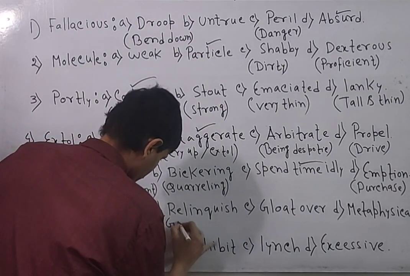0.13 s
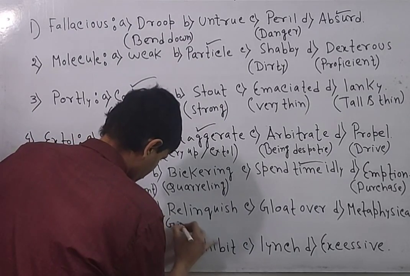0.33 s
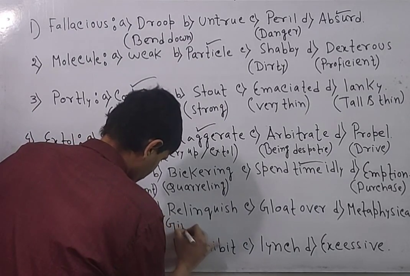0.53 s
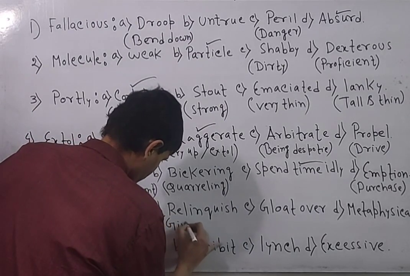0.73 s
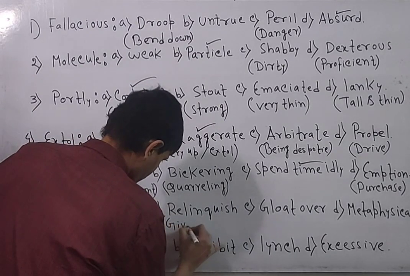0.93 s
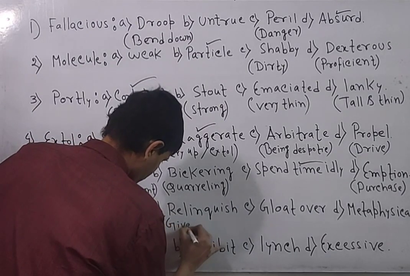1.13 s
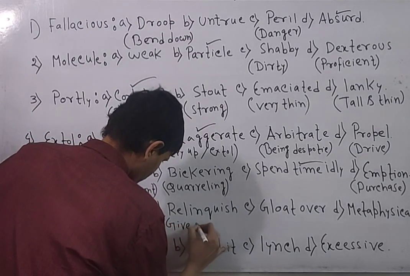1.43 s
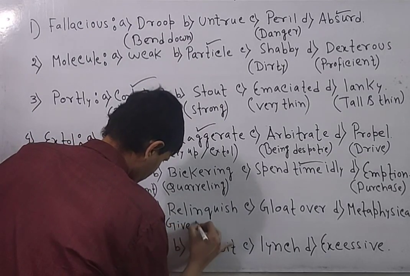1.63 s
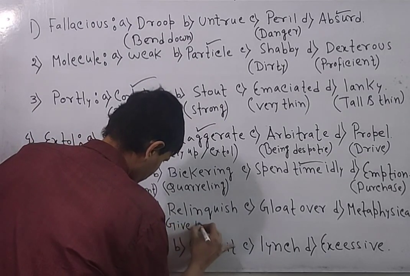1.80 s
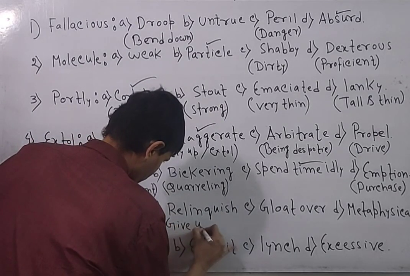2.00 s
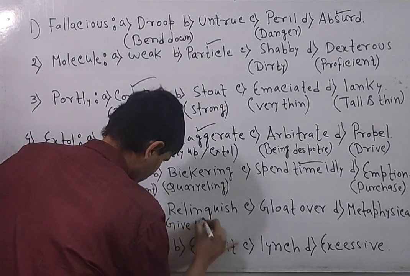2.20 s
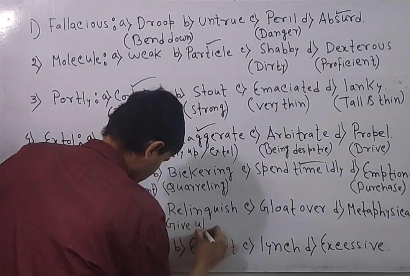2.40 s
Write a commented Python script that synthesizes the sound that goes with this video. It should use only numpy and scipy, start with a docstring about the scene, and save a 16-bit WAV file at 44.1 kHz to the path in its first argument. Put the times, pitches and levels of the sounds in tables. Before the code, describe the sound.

A felt marker taps and rubs on a wall-hung whiteboard in a small, boomy room

```python
"""Over faint room noise a knock booms away; a marker is writing letters on a wall-hung whiteboard.
Each touch-down in the small, bare classroom is made of short swelling tones and a tick of noise.
Standing waves, a few wall reflections and a tail of scattered echoes let board and room boom on.
Between knocks the felt tip rubs in short, dry strokes: shaped noise that follows the pen's speed."""
import sys
import numpy as np
from scipy import signal
from scipy.fft import rfft, irfft, next_fast_len
from scipy.io import wavfile

SR = 44100
rng = np.random.default_rng(int(sys.argv[2]) if len(sys.argv) > 2 else 0)


def unload_audio(sound):
    """Save the sound as a 16-bit wav file, at the path given as the first command line argument."""
    columns = np.transpose(np.atleast_2d(sound))
    # keep every value between -1 and 1, then stretch to whole-number steps
    steps = np.round(np.clip(columns, -1, 1) * 32767)
    wavfile.write(sys.argv[1], SR, steps.astype(np.int16))


N = 112454
LEAD = SR // 4  # samples computed ahead of time zero, so that earlier sounds can ring into the scene

# Tone colour of felt rubbing on the board: (frequency [Hz], relative level [dB])
FELT_HISS = [(500, -1), (1200, -12), (1700, -3.5), (2250, -5.5), (3000, -14), (3750, -1), (4350, -6.5),
             (4900, -1.5), (5450, -0.5), (6400, -9.5), (8800, -8), (10400, -12), (11700, -5),
             (13100, -16.5), (14400, -5.5), (15500, -16.5)]


def amp(db):
    """Turns decibels into gain."""
    return 10 ** (np.asarray(db) / 20)


def unit(x):
    """Scales a sound to an rms (average strength) of 1."""
    return x / np.sqrt(np.mean(x ** 2) + 1e-20)


def read(points, hz):
    """Reads between the points of a table, along a logarithmic frequency axis."""
    f, value = np.transpose(points)
    return np.interp(np.log(hz + 1), np.log(f), value)


def colour(x, db_at):
    """Makes each frequency louder or softer; db_at gives the decibels for a frequency in Hz."""
    size = next_fast_len(len(x) + 2048)
    gain = amp(db_at(np.fft.rfftfreq(size, 1 / SR)))
    return irfft(rfft(x, size) * gain, size)[:len(x)]


def coloured_noise(size, points):
    """Random noise with the tone colour of a table, at rms 1."""
    return unit(colour(rng.standard_normal(size), lambda hz: read(points, hz)))


def add(track, s, sound):
    """Adds a sound, s seconds after time zero, to a track that starts LEAD samples earlier."""
    part = track[LEAD + round(s * SR):][:len(sound)]
    part += sound[:len(part)]  # changes the track itself


def room(x):
    """Scattered late echoes of random sign, fading at a different pace in each frequency range."""
    # Room decay: (frequency [Hz], time to fall by 60 dB [s])
    decay = [(100, 0.52), (260, 0.39), (700, 0.52), (2000, 0.19), (6000, 0.12), (15000, 0.085)]
    delay_s, spacing = 0.007, 20  # one echo in every 20 samples
    at = np.arange(0, SR - spacing, spacing)
    taps = np.zeros(SR)
    taps[at + rng.integers(0, spacing, len(at))] = rng.choice([-1., 1.], len(at))
    hz, t, spectrum = signal.stft(taps, SR, nperseg=512)
    t60 = read(decay, hz)[:, None]
    fade = 1000 ** (-t / t60)
    level = np.sqrt(2 * np.log(1000) / t60 / len(at))  # same total energy for long and short decays
    tail = signal.istft(spectrum * fade * level, SR)[1]
    delayed_tail = np.pad(tail, (round(delay_s * SR), 0))
    return signal.fftconvolve(x, delayed_tail)[:len(x)]


def still_room():
    """Steady low murk of the room and microphone hiss, made from shaped noise."""
    # Colour of the still room: (frequency [Hz], relative level [dB])
    murk_colour = [(20, -21), (60, -15.5), (130, 7.5), (280, 8.5), (450, 3), (700, -1), (1100, -4),
                   (2200, -11.5), (5000, -15), (9000, -17), (15500, -18.5)]
    level_db = -63.5
    return amp(level_db) * coloured_noise(LEAD + N, murk_colour)


def friction(size):
    """Rubbing noise: fibres of the tip catch and let go, and their grip is uneven."""
    catches_per_s, catch_share = 2500, 0.36  # average rate; catches' share of the noise power
    flicker_db, flicker_hz = 0.56, 90  # rms size of the flicker; above this it gets much weaker
    catches = rng.standard_normal(size) * (rng.random(size) < catches_per_s / SR)
    grip = unit(colour(rng.standard_normal(size), lambda hz: -20 * np.log10(1 + (hz / flicker_hz) ** 2)))
    smooth = np.sqrt(1 - catch_share) * rng.standard_normal(size)
    rub = smooth + np.sqrt(catch_share) * unit(catches)
    return rub * amp(flicker_db * grip)


def tip_db(hz, lower_hz, upper_hz):
    """Colour of one stroke in dB: felt hiss, two rings of the tip and a fine ripple."""
    lower_db, lower_width_hz = 4.5, 240
    upper_db, upper_width_hz = 7.5, 780
    ripple_db, ripple_hz = 3, 89.9  # typical size; frequency step between random points
    lower_ring = lower_db * np.exp(-((hz - lower_hz) / lower_width_hz) ** 2)
    upper_ring = upper_db * np.exp(-((hz - upper_hz) / upper_width_hz) ** 2)
    # many small resonances of pen and board, different at each spot
    points = rng.standard_normal(size=1024)
    ripple = ripple_db * np.interp(hz / ripple_hz, np.arange(len(points)), points)
    return read(FELT_HISS, hz) + lower_ring + upper_ring + ripple


def strokes():
    """Each stroke speeds up and slows down; tip hiss and board drone follow its speed."""
    # Strokes of the pen: (start [s], length [s], hiss level [dB], board drone level [dB],
    # fastest point [share of length, held to 0.05-0.95], lower tip ring [Hz], upper tip ring [Hz])
    pen_strokes = [(-0.04, 0.12, -64, -52, 0.38, 5000, 8200), (0.08, 0.15, -86, -58, 0.41, 5000, 8000),
                   (0.257, 0.044, -71.5, -52, 0.34, 5000, 8220),
                   (0.487, 0.087, -65.5, -64, 0.21, 5110, 8300), (0.623, .142, -53, -57, 0.54, 4900, 7700),
                   (0.983, 0.13, -59.5, -57.5, 0.65, 5300, 7750),
                   (1.096, 0.085, -61, -60.5, 0.36, 5530, 8360), (1.169, 0.12, -59, -59, 0.72, 5300, 8100),
                   (1.667, 0.13, -63, -55.5, 0.15, 5100, 8400), (1.778, 0.12, -55.5, -57.5, 1, 5260, 7900),
                   (1.946, 0.11, -62.5, -59, 0.2, 5300, 8000), (2.296, 0.22, -60, -55.5, 0.64, 5300, 8500)]
    # The board under a moving tip: (frequency [Hz], relative level [dB])
    drone_colour = [(30, -43), (70, -32), (140, -7), (270, 4.5), (420, -4), (680, 0), (1000, -10),
                    (1600, -17.5), (3000, -36.5)]
    # Moments when the tip snags: (time [s], level [dB])
    snags = [(1.195, -50), (1.602, -59), (1.855, -62)]
    speed_power = 0.77  # below 1 makes the arch of speed broader
    snag_s, wet_db = 0.0017, -8  # time for a snag to fall to 37 %; level of the room tail
    out, t = np.zeros(LEAD + N), np.arange(SR // 3) / SR
    for s, length, hiss_db, drone_db, fastest, lower_hz, upper_hz in pen_strokes:
        peak_at = np.clip(fastest, 0.05, 0.95)
        progress = np.interp(t / length, [0, peak_at, 1], [0, 0.5, 1])
        speed = abs(np.sin(np.pi * progress)) ** speed_power
        hiss = unit(colour(friction(len(t)), lambda hz: tip_db(hz, lower_hz, upper_hz)))
        drone = unit(colour(friction(len(t)), lambda hz: read(drone_colour, hz)))
        add(out, s, speed * (amp(hiss_db) * hiss + amp(drone_db) * drone))
    for s, db in snags:
        add(out, s, amp(db) * np.exp(-t / snag_s) * coloured_noise(len(t), FELT_HISS))
    return out + amp(wet_db) * room(out)


def wavelet(t, hz, swell_ms):
    """A short tone whose outline swells to height 1 at twice swell_ms and then dies away."""
    peak_s = 2 * swell_ms / 1000
    u = np.maximum(t, 0) / peak_s
    outline = (u * np.exp(1 - u)) ** 2
    return outline * np.sin(2 * np.pi * hz * (t - peak_s))


def boom(x):
    """The direct sound, its first reflections and the standing waves that it sets ringing."""
    # Standing waves of board and room: (frequency [Hz], gain at that frequency [dB], 60 dB decay [s])
    standing_waves = [(135.86, 12.5, 0.49), (161.5, 14.5, 0.52), (203.3, 15.5, 0.39), (243.2, 11.5, 0.27),
                      (279, -3.5, 0.9), (300.8, 3.5, 0.29), (366, -0.8, 0.96), (374.7, 15.5, 0.28),
                      (448.4, 0.5, 0.24), (508.4, 5.5, 0.57), (559.6, 6, 0.077), (613, -0.5, 0.19),
                      (654.4, 8, 0.52), (705, 9, 0.11), (809, 5.5, .25)]
    # First reflections from the walls: (delay [s], gain [factor])
    reflections = [(0.0258, 0.25), (0.0356, 0.14), (0.071, 0.071)]
    t = np.arange(SR) / SR
    ring = np.zeros(SR)
    for hz, db, t60 in standing_waves:
        level = amp(db) * 2 * np.log(1000) / t60 / SR  # evens out long and short decays
        ring += level * 1000 ** (-t / t60) * np.cos(2 * np.pi * hz * t)
    echoes = sum(gain * np.pad(x, (round(delay * SR), 0))[:len(x)] for delay, gain in reflections)
    return x + echoes + signal.fftconvolve(x, ring)[:len(x)]


def knocks():
    """The pen lands: a low thud and push, a higher clack of the panel and a faint tick of contact."""
    # Knocks, levels before filtering: (time [s], thud level [dB], thud pitch [Hz],
    # half the thud's swell time [ms], push level [dB], clack level [dB], clack pitch [Hz])
    touch_downs = [(-0.035, -25.5, 245, 1.8, -32, -24.5, 667), (0.2068, -18, 256.3, 1.794, -26.5, -17, 610),
                   (0.4355, -27, 234.5, 2.16, -36, -25.5, 547), (0.9719, -33, 190.5, 1.81, -38.5, -46, 710),
                   (1.275, -55, 324.7, 6, -64, -56, 633), (1.595, -32, 266.8, 5.76, -40, -46, 780),
                   (1.958, -51.5, 290, 3.66, -66, -62, 620), (2.237, -29, 270.9, 5.95, -39.5, -43.5, 557)]
    # Colour of the contact tick: (frequency [Hz], relative level [dB])
    tick_colour = [(100, 4), (1300, -1), (2200, -14), (5500, -17), (8000, -31), (15000, -37.5)]
    push_hz, push_swell_ms = 170.3, 3.185  # the whole board gives; half its swell time
    clack_swell_ms, clack_lag_s = 0.72, 0.001713  # half its swell time; start after the thud
    tick_db, tick_s = -33, 0.01  # level relative to the clack; time to fall to 37 %
    low_hz, top_hz, wet_db = 101, 727, -2.5  # band of the blows; level of the room tail
    blows, ticks = np.zeros(LEAD + N), np.zeros(LEAD + N)
    t = np.arange(SR // 8) / SR
    for s, thud_db, thud_hz, swell_ms, push_db, clack_db, clack_hz in touch_downs:
        thud = amp(thud_db) * wavelet(t, thud_hz, swell_ms)
        push = amp(push_db) * wavelet(t, push_hz, push_swell_ms)
        clack = amp(clack_db) * wavelet(t - clack_lag_s, clack_hz, clack_swell_ms)
        add(blows, s, thud + push + clack)
        tick = coloured_noise(len(t), tick_colour) * np.exp(-t / tick_s)
        add(ticks, s + clack_lag_s, amp(clack_db + tick_db) * tick)
    band = signal.butter(4, [low_hz, top_hz], "bandpass", fs=SR, output="sos")
    impacts = signal.sosfilt(band, blows) + ticks
    return boom(impacts) + amp(wet_db) * room(impacts)


def scene():
    """Room noise, strokes and knocks at one microphone, from time zero on."""
    return (still_room() + strokes() + knocks())[None, LEAD:]


def record(dry):
    """The recorder's band limit: a low-pass filter removes the highest treble."""
    cutoff_hz = 15550
    low_pass = signal.firwin(511, cutoff_hz, window=("kaiser", 9), fs=SR)
    return signal.oaconvolve(dry, low_pass[None], "same")


dry = scene()
out = record(dry)
unload_audio(out)
```